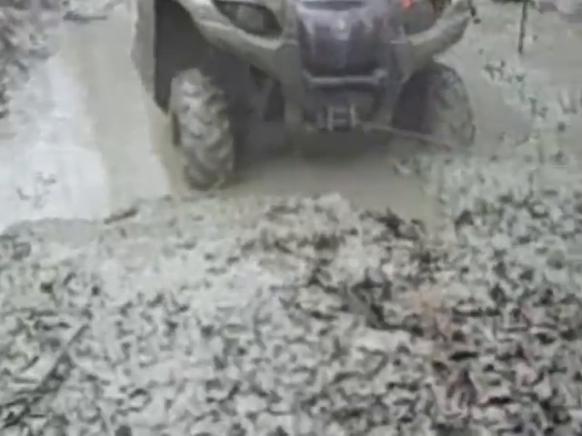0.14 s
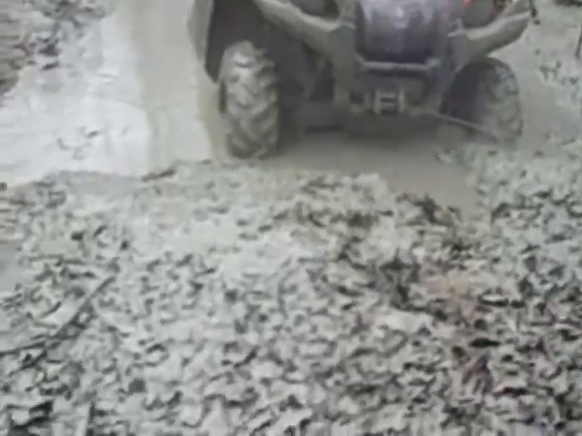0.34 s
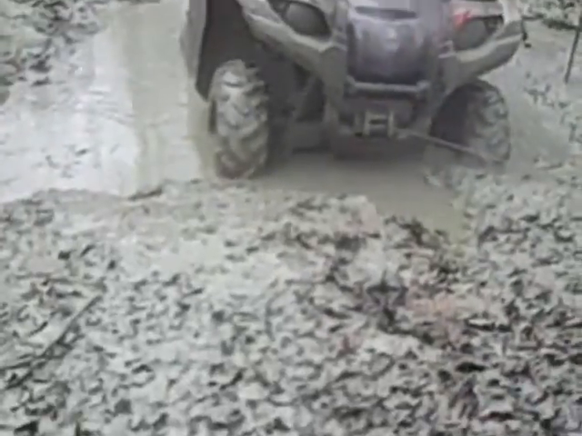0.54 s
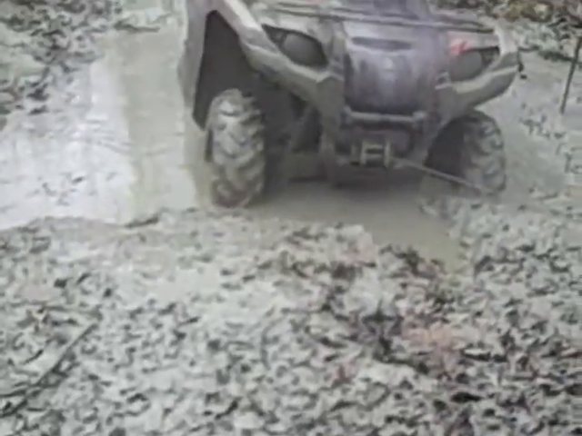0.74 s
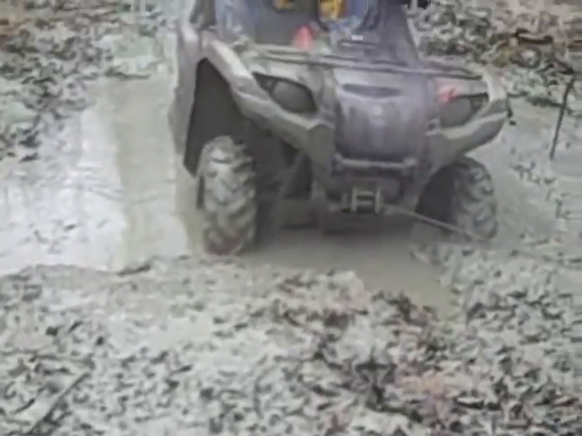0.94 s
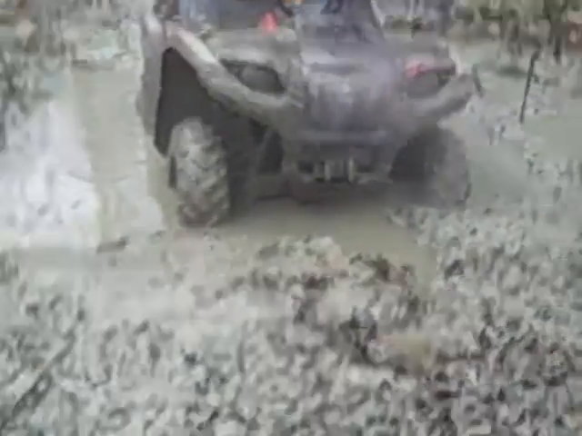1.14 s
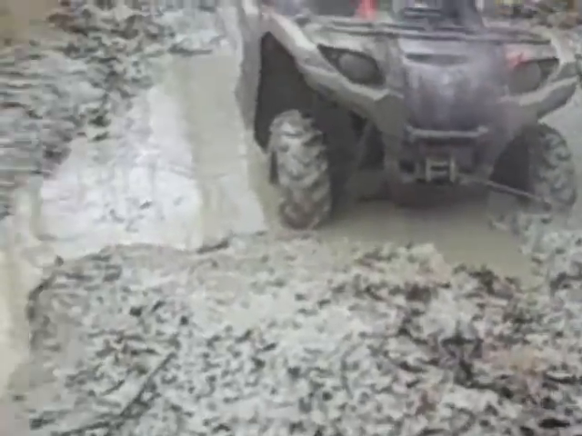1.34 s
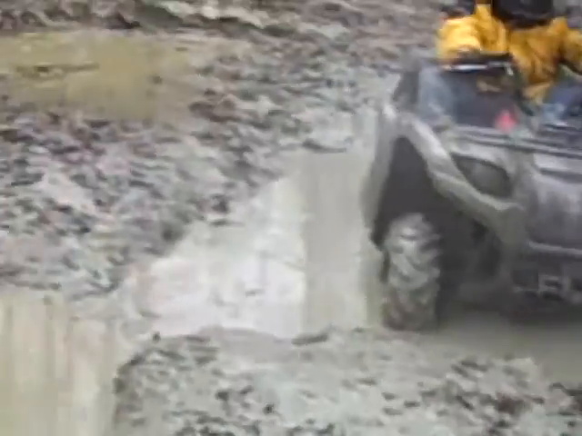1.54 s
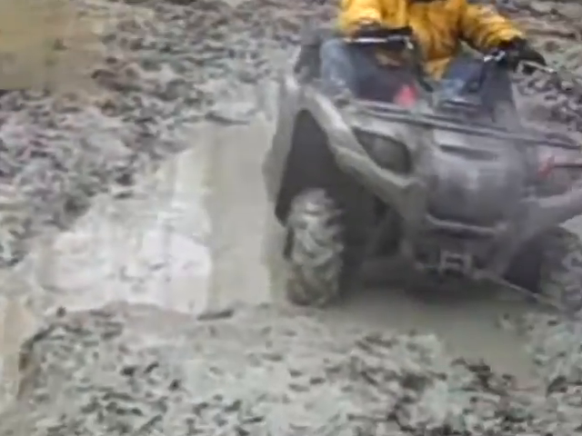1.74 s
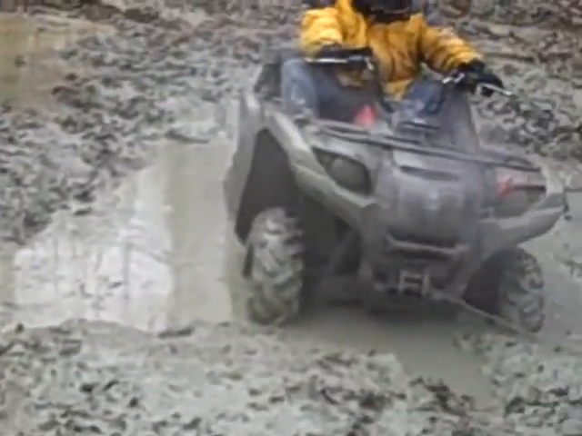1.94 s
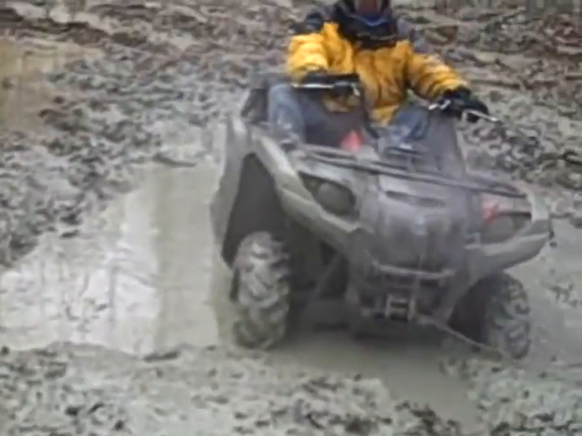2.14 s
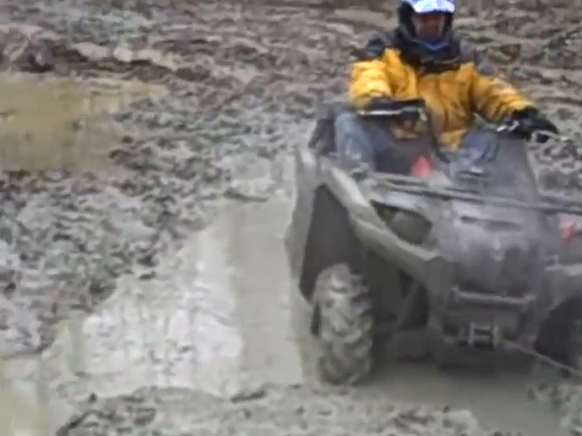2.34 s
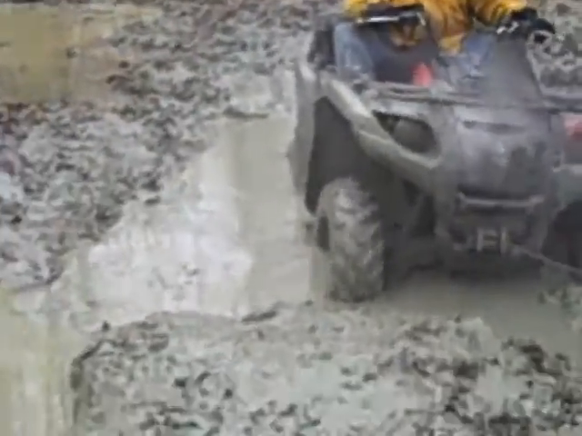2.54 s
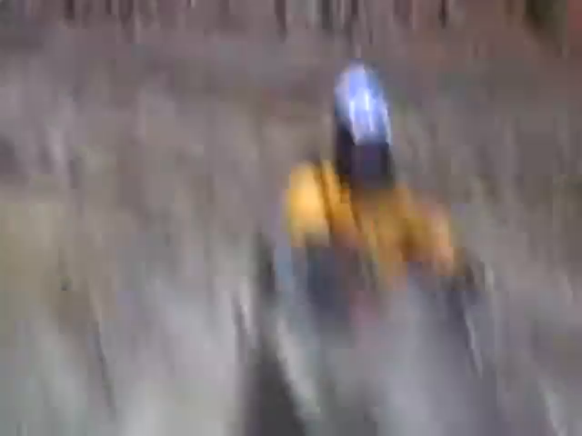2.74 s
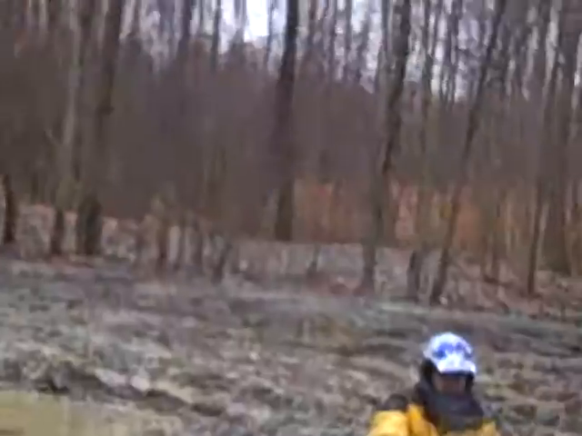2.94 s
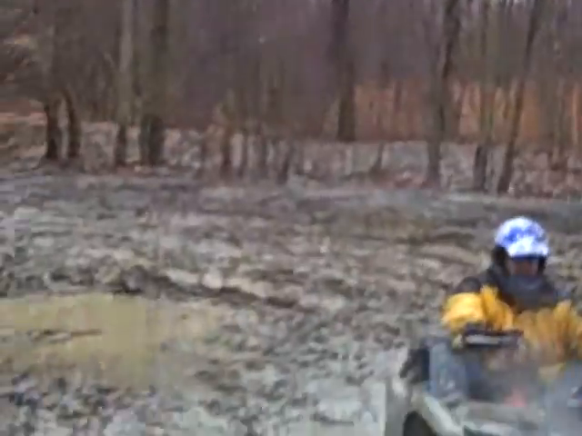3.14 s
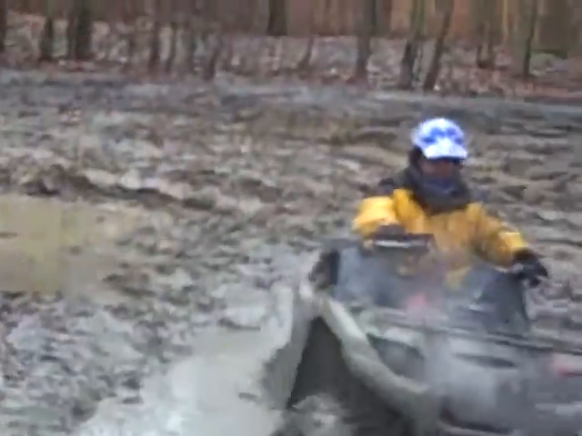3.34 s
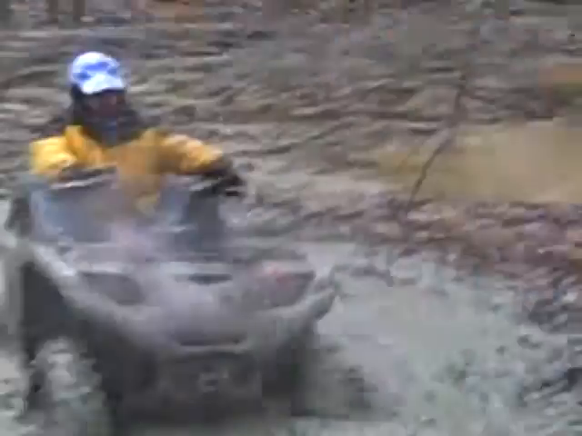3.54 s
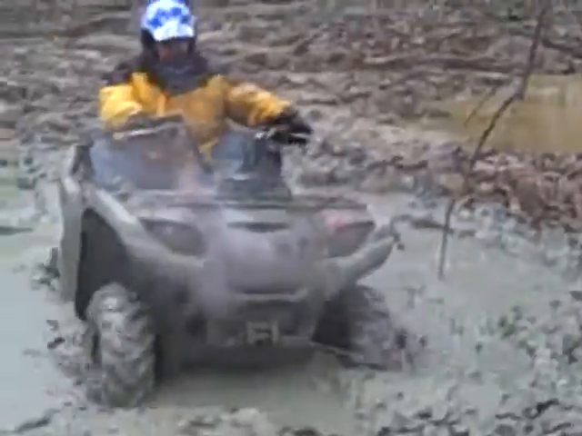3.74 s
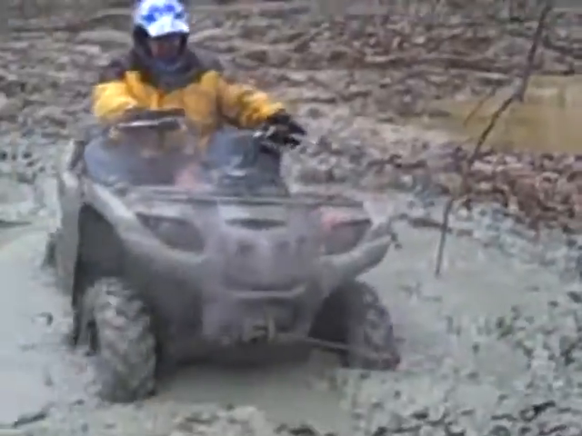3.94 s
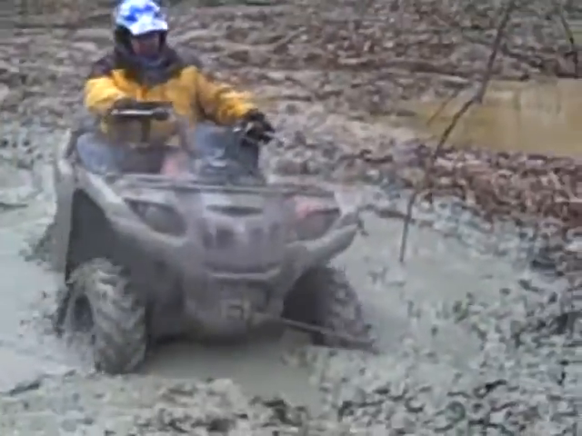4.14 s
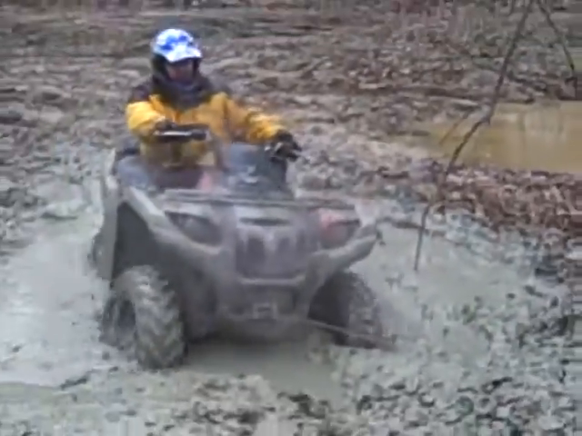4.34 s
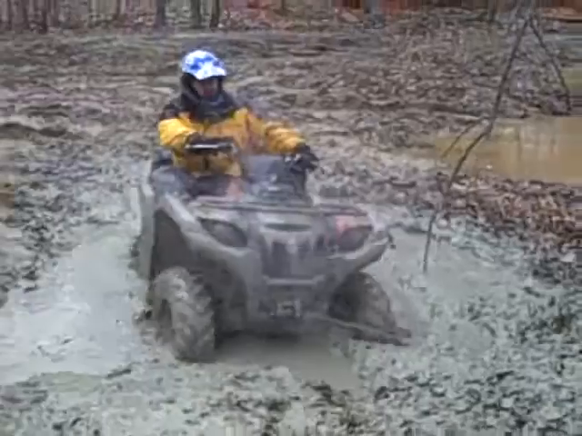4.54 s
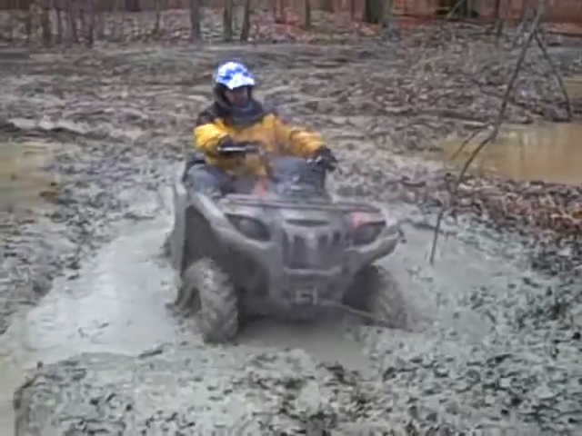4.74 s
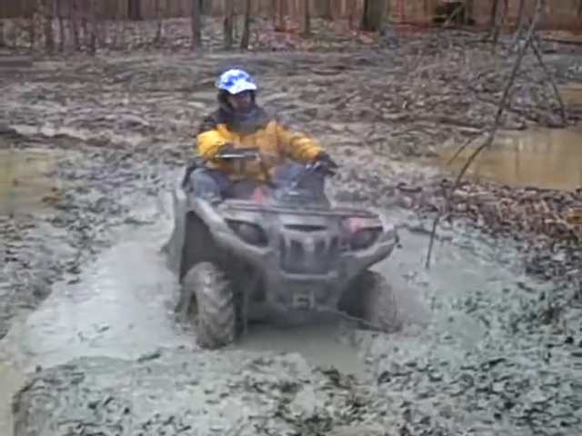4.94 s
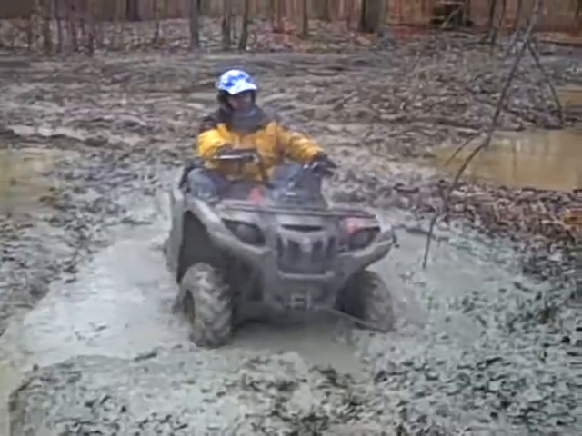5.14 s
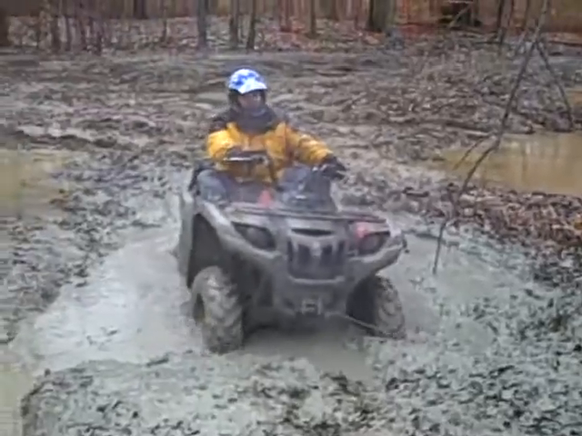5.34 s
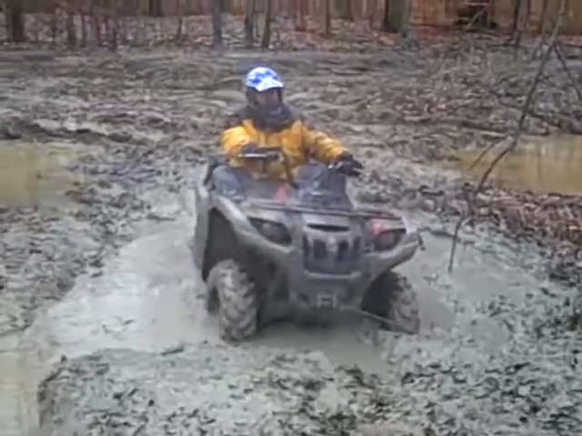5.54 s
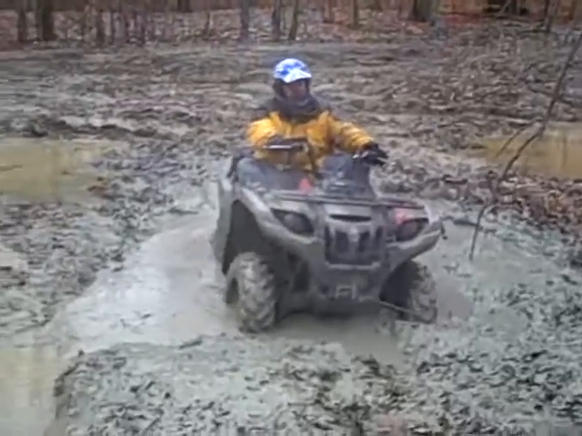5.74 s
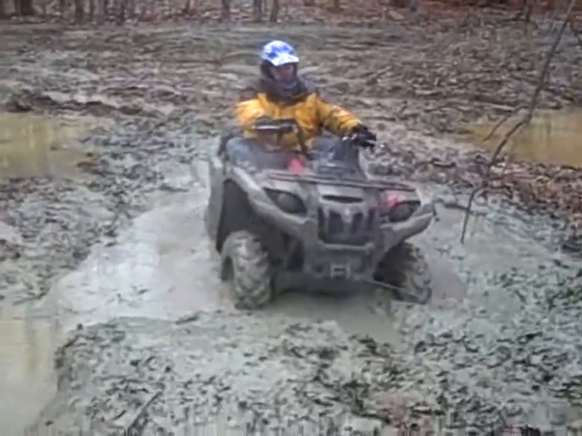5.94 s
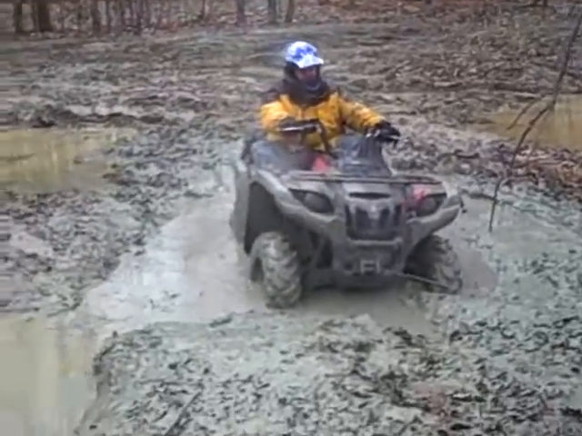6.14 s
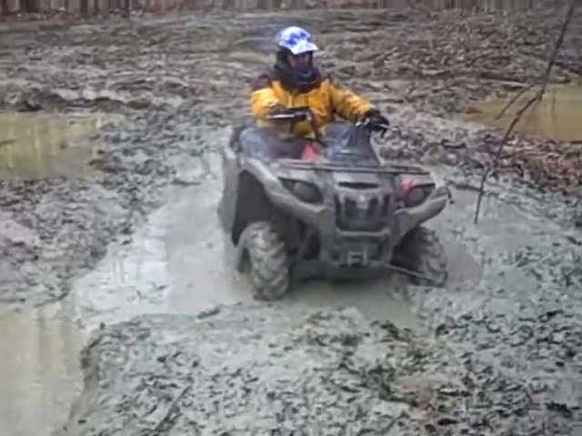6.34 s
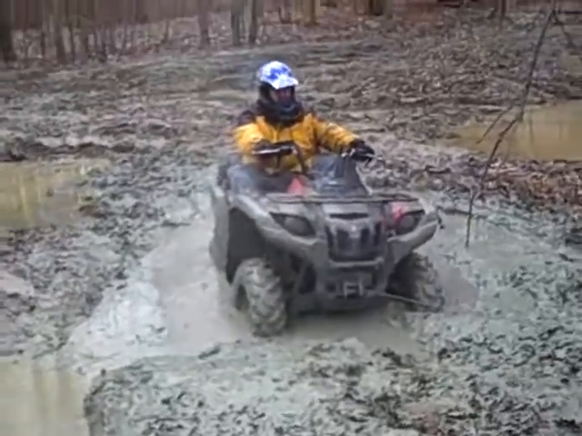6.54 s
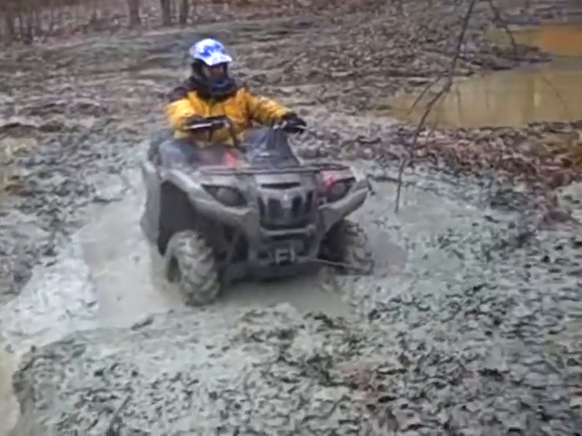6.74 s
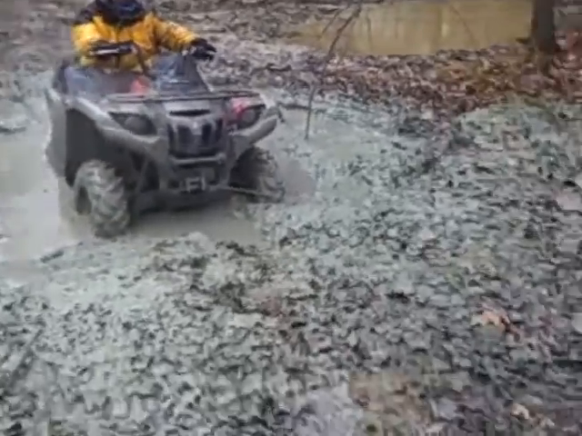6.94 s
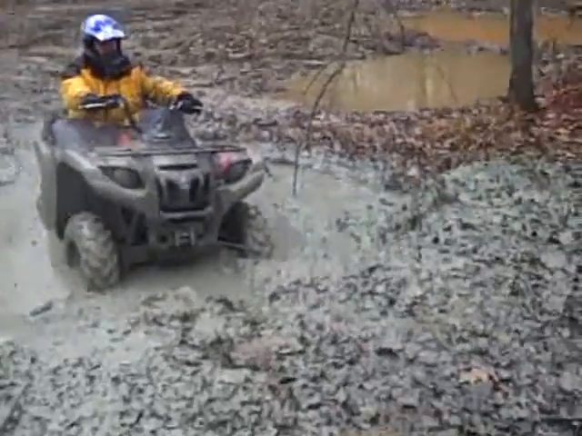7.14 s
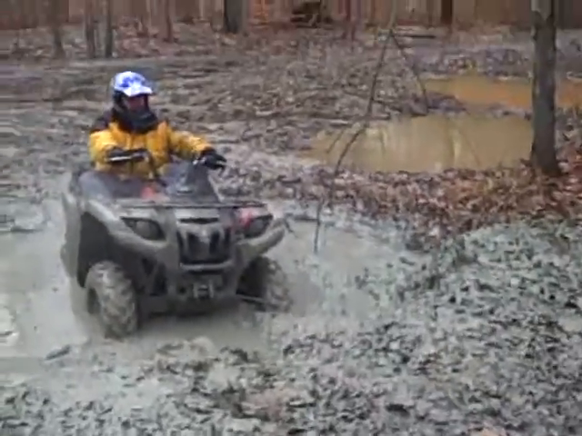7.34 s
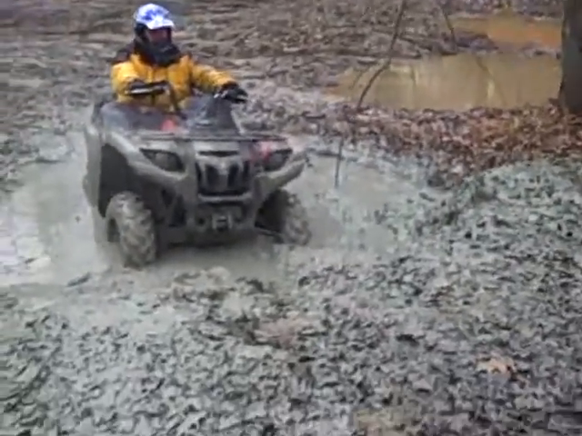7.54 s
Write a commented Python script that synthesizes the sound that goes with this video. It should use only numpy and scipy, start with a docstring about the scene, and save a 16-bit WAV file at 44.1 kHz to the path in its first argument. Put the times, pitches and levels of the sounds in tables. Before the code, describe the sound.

A quad bike idles with slow separate thuds in mud, blips, then revs hard with churning slurry and spray before settling back to idle.

```python
"""A single-cylinder quad bike in deep mud: separate thuds at idle, a blip, repeated revs, idle again.
Each firing triggers an exhaust pulse, gas rasp and airbox honk; noise knocks ring the engine covers.
Clumped drop grains and filtered noise form the churned slurry, spray, splats, squirts and trickle.
Clods smack down, wind puffs brush the microphone; late on a small metal part snaps and chatters in
a faint hiss. A notch and faint tail place it outdoors; the microphone dulls the treble."""
import sys
import numpy as np
from scipy import signal
from scipy.fft import rfft, irfft
from scipy.io import wavfile

SR = 44100
rng = np.random.default_rng(int(sys.argv[2]) if len(sys.argv) > 2 else 0)


def unload_audio(sound):
    """Save the sound as a 16-bit wav file, at the path given as the first command line argument."""
    columns = np.transpose(np.atleast_2d(sound))
    # keep every value between -1 and 1, then stretch to whole-number steps
    steps = np.round(np.clip(columns, -1, 1) * 32767)
    wavfile.write(sys.argv[1], SR, steps.astype(np.int16))


N = 335160
T = np.arange(N) / SR


def amp(db):
    """Decibels to gain."""
    return 10 ** (np.asarray(db) / 20)


def unit(x):
    """Scales to rms 1."""
    return x / np.sqrt(np.mean(x ** 2) + 1e-20)


def curve(rows, t=T):
    """Joins the rows (time [s], value) by straight lines."""
    return np.interp(t, *np.transpose(rows))


def add(mix, start_s, sound):
    """Mixes a sound in at start_s."""
    part = mix[max(0, round(start_s * SR)):][:len(sound)]
    part += sound[:len(part)]


def ring(spectrum, peaks=(), size=4096):
    """Minimum-phase impulse response, energy 1, of a spectrum with resonances (Hz, width Hz, dB)."""
    hz = abs(np.fft.fftfreq(size, 1 / SR))
    f, db = np.transpose(spectrum)
    db = np.interp(np.log(hz + 1), np.log(f), db)
    for centre, width, height in peaks:
        db = db + height / (1 + (2 * (hz - centre) / width) ** 2)
    causal_log = np.conj(signal.hilbert(np.log(amp(db))))
    h = np.fft.ifft(np.exp(causal_log)).real
    return h / np.linalg.norm(h)


def thump(spectrum, size=2048):
    """Zero-phase pressure pulse of height 1, symmetric about its middle."""
    f, db = np.transpose(spectrum)
    hz = np.fft.rfftfreq(size, 1 / SR)
    pulse = np.fft.fftshift(irfft(amp(np.interp(np.log(hz + 1), np.log(f), db))))
    return pulse / pulse.max()


def through(x, h):
    """Convolves x with the response h."""
    return signal.oaconvolve(x, h)[:N]


def wander(rate_hz):
    """Slow random fluctuation of rms 1."""
    lowpass = 1 / (1 + (np.fft.rfftfreq(N, 1 / SR) / rate_hz) ** 4)
    return unit(irfft(rfft(rng.standard_normal(N)) * lowpass, N))


def held(start_s, length_s, rise_s, fall_s):
    """Envelope: linear rise, hold, exponential decay."""
    rise = np.clip((T - start_s) / rise_s, 0, 1)
    return rise * np.exp(-np.maximum(T - start_s - length_s, 0) / fall_s)


def burst(centre_s, half_length_s, edge=3.0):
    """Brief swell with a flat top and steep sides."""
    return np.exp(-np.minimum(abs((T - centre_s) / half_length_s), 4) ** edge)


def patchy(x, depth_db, width_hz, length_s):
    """Random narrow bands swell and fade, so the colour keeps shifting."""
    hz, t, z = signal.stft(x, SR, nperseg=1024, noverlap=768)
    across = np.fft.fftfreq(len(hz), hz[1])[:, None]
    along = np.fft.fftfreq(len(t), t[1])
    blur = np.exp(-(across * width_hz) ** 2 - (along * length_s) ** 2)
    field = unit(np.fft.ifft2(np.fft.fft2(rng.standard_normal(z.shape)) * blur).real)
    z = z * amp(depth_db * np.clip(field, -2, 2))
    return unit(signal.istft(z, nperseg=1024, noverlap=768)[1][:N])


def grains(per_s, low_hz, high_hz, cycles, spread_db, clump_db, count=28):
    """Bursting bubbles and drops: short rings of rising pitch, in clumps, over count pitches."""
    out = np.zeros(N)
    for hz in np.linspace(low_hz, high_hz, count):
        u = np.arange(int(4 * cycles * SR / hz)) * hz / SR / cycles
        grain = np.sin(2 * np.pi * cycles * u * (1 + u / 20)) * np.exp(-2 * u)
        at = np.flatnonzero(rng.random(N) < per_s / count / SR)
        clump = curve(np.c_[np.linspace(0, T[-1], 200), rng.standard_normal(200)], T[at])
        size_db = spread_db * np.minimum(rng.exponential(1, len(at)), 4) + clump_db * clump
        train = np.zeros(N)
        train[at] = amp(size_db) * (-1) ** at
        out += through(train, unit(grain) / np.sqrt(len(u)))
    return unit(out)


# engine speed: (time [s], firing rate [1/s])
ENGINE_SPEED = [(0.0, 12.71), (0.19, 13.04), (1.37, 13.31), (2.33, 12.99), (2.54, 29.58), (2.69, 20.97),
                (2.8, 20.52), (3.02, 33.58), (3.25, 32.36), (3.6, 20.74), (3.81, 18.04), (4.0, 33.0),
                (4.11, 25.93), (4.58, 25.18), (5.03, 17.44), (5.12, 18.29), (5.5, 13.06), (7.6, 13.14)]
IDLE_RATE_HZ = 13.1


def firing_rate(t=T):
    """Firings per second at time t."""
    return curve(ENGINE_SPEED, t)


def octaves():
    """Engine speed in doublings above idle."""
    return np.log2(firing_rate() / IDLE_RATE_HZ)


# rider's thumb opens the throttle: (start [s], held [s], extra blow strength [dB])
THROTTLE_OPENINGS = [(2.319, 0.2, 11.5), (2.801, 0.32, 9.5), (3.06, 0.31, 5), (3.38, 0.26, 4),
                     (3.799, 0.21, 9.5), (4.02, 0.055, 8), (4.17, 0.084, 8.5), (4.37, 0.32, 6.5),
                     (4.741, 0.43, 5), (5.1, 0.11, 0.5)]
THROTTLE_OPEN_S, THROTTLE_SHUT_S = 0.059, 0.014


def throttle():
    """Extra blow strength from the open throttle, dB."""
    return sum(db * held(start, length, THROTTLE_OPEN_S, THROTTLE_SHUT_S)
               for start, length, db in THROTTLE_OPENINGS)


# weaker or stronger firings: (time [s], strength change [dB])
UNEVEN_FIRINGS = [(.01, -9.5), (.923, -4), (1.525, -7), (2.42, 1), (2.465, 1.5), (2.505, 0.5), (2.54, 7),
                  (2.613, 2.5), (2.701, 3), (2.797, 5), (2.575, 2), (2.843, 0), (3.05, 1.5), (3.08, -7.5),
                  (3.11, -5.5), (3.26, 2), (3.435, 2.5), (3.56, 2), (3.655, 6), (3.758, -9), (3.81, 6),
                  (4.07, 3.5), (4.145, 2), (4.34, 1), (4.615, -2.5), (4.94, 1.5), (5.218, 7.5), (5.279, 1),
                  (5.412, -20), (6.25, -22), (6.931, -6)]
IDLE_BLOW_DB, BLOW_DB_PER_OCTAVE = -34.5, 4  # before the exhaust's own gains


def firings():
    """Firing times, strengths in dB and cycles turned; strength grows with speed and throttle."""
    cycles = np.cumsum(firing_rate()) / SR - 1 / 10
    times = np.interp(np.arange(int(cycles[-1]) + 1), cycles, T)
    force_db = IDLE_BLOW_DB + BLOW_DB_PER_OCTAVE * octaves() + throttle()
    db = np.interp(times, T, force_db) + 0.74 * rng.standard_normal(len(times))
    for when, change_db in UNEVEN_FIRINGS:
        db[np.argmin(abs(times - when))] += change_db
    jitter_s = .00015 * rng.standard_normal(len(times))
    return times + jitter_s, db, cycles


# blow running to and fro in the exhaust: (delay [s], share [ratio])
PIPE_ECHOES = [(.0043, 1), (0.0102, 0.96), (.0185, .12), (0.026, 0.22)]
# idle blow spectrum: (frequency [Hz], relative level [dB per Hz])
IDLE_BLOW = [(20, -31), (50, -23), (80, -5.5), (115, 2.5), (150, -1.5), (200, -2), (260, -1), (320, -8),
             (400, -20), (520, -20), (700, -31), (1500, -34.5), (4000, -59.5)]
# blow spectrum at speed: (frequency [Hz], relative level [dB per Hz])
REV_BLOW = [(20, -23.5), (45, -21.5), (75, -6), (110, 3), (160, -2), (235, 7), (290, -7), (385, -27.5),
            (510, -23), (750, -27), (1500, -42), (4000, -63.5)]
# silencer ringing: (frequency [Hz], relative level [dB], decay [s])
SILENCER_MODES = [(257, -5, 0.0056), (331, -6.5, 0.01), (505, -14, 0.011)]


def exhaust(times, strengths, lead_s=0.00347, idle_db=22.0, bark_from_db=-19, bark_growth=0.76):
    """Idle: dull thuds with pipe echoes; at speed: tight thumps, and hard blows bark the silencer."""
    rev_db, echo_s, echo_share = -.8, .0087, .3
    slow, fast, t = np.zeros(N), np.zeros(N), np.arange(SR // 10) / SR
    pulse = thump(REV_BLOW)
    bark = sum(amp(db) * np.cos(2 * np.pi * hz * t) * np.exp(-t / decay)
               for hz, db, decay in SILENCER_MODES)
    bark *= 1 - np.exp(-t / 0.00045)
    for s, db in zip(times, strengths):
        revving = np.clip((firing_rate(s) - 13.8) / 1.7, 0, 1)
        size = -amp([db])  # wave starts with a pressure dip
        for delay, share in [(0.000068, 1)] + PIPE_ECHOES:
            varied = share * (1 + 0.031 * rng.standard_normal())
            add(slow, s - lead_s + delay, size * (1 - revving) * varied)
        # under load, blows differ in size and echo
        burn = amp(1.5 * rng.standard_normal())
        bounce = 1 + .6 * rng.standard_normal()
        for delay, share in [(0, 1), (echo_s, echo_share * bounce)]:
            add(fast, s + delay - len(pulse) / 2 / SR, size * revving * burn * share * pulse)
        add(fast, s, size * revving * amp(bark_growth * min(db - bark_from_db, 0)) * bark)
    return amp(idle_db) * through(slow, ring(IDLE_BLOW)) + amp(rev_db) * fast


# harsh gas spectrum: (frequency [Hz], relative level [dB per Hz])
GAS_SPECTRUM = [(30, -23.5), (70, -4), (130, -4), (230, 4), (320, 5.5), (410, 3.5), (520, 2), (700, -5.5),
                (1100, -4), (2000, -6.5), (3400, -1.5), (5000, -11.5), (7000, -39.5), (9000, -36)]


def rasp(times, strengths, decay_s=0.024, growth=1.65, level_db=-22, repeat=0.62):
    """Harsh gas noise puffs with each blow, partly alike, growing with blow strength and speed."""
    puffs, t = np.zeros(N), np.arange(SR // 10) / SR
    own = rng.standard_normal(len(t))
    shape = (1 - np.exp(-t / 0.0042)) * np.exp(-t / decay_s)
    for s, db in zip(times, strengths):
        gas = unit(repeat * own + (1 - repeat) * rng.standard_normal(len(t)))
        flow = np.clip(firing_rate(s) / 26, 0, 1) ** 2
        add(puffs, s - .003, amp(level_db + growth * (db + 22.5)) * flow * shape * gas)
    return through(puffs, ring(GAS_SPECTRUM, [(517.0, 35, 6.4), (1057, 38, 5.7), (3630, 130, 3.9)]))


# valve gear knocks: (phase after firing [cycles], relative size [ratio])
VALVE_KNOCKS = [(0.03, 0.37), (.14, 0.48), (0.238, 1), (0.449, 0.29), (0.662, 0.34), (.82, 0.56)]
# engine noise spectrum: (frequency [Hz], relative level [dB per Hz])
CASE_SPECTRUM = [(25, -31.5), (45, -24), (90, 4), (250, 2), (410, 0.5), (520, -2), (650, -2.5), (1200, -2),
                 (1900, -5), (2600, -8), (3600, -8.5), (4400, -15.5), (7200, -19.5), (9000, -40)]
# ringing of covers and frame: (frequency [Hz], width [Hz], height above the rest [dB])
COVER_MODES = [(553, 22, 3.5), (806, 53, 6.5), (1190, 280, 2.5), (1351, 34, 10), (1855, 220, 2.5),
               (5396, 260, 9)]


def clatter(cycles, decay_s=0.0039, knock=0.93, repeat=0.56, level_db=-42.5, db_per_decade=13,
            throb_db=1.0):
    """Valve knocks and the whirr of chain and belt sound through the engine's covers."""
    knocks, t = np.zeros(N), np.arange(SR // 20) / SR
    for phase, size in VALVE_KNOCKS:
        own = rng.standard_normal(len(t))  # part shared by every cycle
        for s in np.interp(np.arange(int(cycles[-1])) + phase, cycles, T):
            noise = unit(repeat * own + (1 - repeat) * rng.standard_normal(len(t)))
            add(knocks, s, size * amp(3.3 * rng.standard_normal()) * noise * np.exp(-t / decay_s))
    # whirr is loudest during the power stroke
    throb = throb_db * np.cos(2 * np.pi * (cycles - .2))
    whirr = rng.standard_normal(N) * amp(0.85 * wander(25) + throb)
    level = amp(level_db + db_per_decade * np.log10(firing_rate() / 13))
    source = patchy(whirr + knock * knocks, depth_db=3.0, width_hz=40, length_s=0.078)
    return level * unit(through(source, ring(CASE_SPECTRUM, COVER_MODES)))


# water off the wheels and frame: (time [s], level [dB])
TRICKLE_LEVEL = [(0, -53.5), (1.05, -48.5), (1.7, -54), (2.3, -54), (5.5, -65), (7.6, -78)]


def trickle():
    """Small drops fall back into the puddle as clumped ringing grains."""
    drops = grains(per_s=2500, low_hz=1960, high_hz=3760, cycles=13, spread_db=-1.5, clump_db=7.5,
                   count=16)
    return amp(curve(TRICKLE_LEVEL)) * drops


# wind on the microphone: (time [s], level [dB])
WIND_LEVEL = [(0, -80), (2.3, -74.5), (3.6, -61.5), (3.665, -39), (3.78, -52), (3.85, -56), (4.5, -64.5),
              (7.5, -79), (7.6, -49)]


def wind():
    """Low-frequency noise buffets the microphone."""
    colour = ring([(8, 0.0), (25, -15.0), (60, -11.0), (150, -32), (600, -59.0)])
    return amp(curve(WIND_LEVEL)) * unit(through(rng.standard_normal(N), colour))


# clods on the bodywork and in the puddle: (time [s], peak at source [dB], centre [Hz])
CLOD_HITS = [(0.431, -29, 3300), (0.504, -28, 3050), (0.623, -30, 2400), (0.677, -43, 4300),
             (0.802, -26, 3930), (0.914, -26, 2390), (2.346, -21, 1560), (2.41, -23, 1700),
             (3.0562, -7.5, 3440), (3.067, -10, 2940), (4.0677, -14, 3300), (4.408, -17, 1690),
             (4.5135, -14.5, 1700), (4.7725, -12, 1865), (4.9434, -11, 3300), (4.9535, -20, 2550),
             (5.064, -26, 2800), (5.176, -23, 2600), (5.235, -20, 2780)]
# brief jets of muddy water; the row at 7.227 is a faint hiss around the metal snap:
# (time [s], level at source [dB], half length [s], centre [Hz])
SQUIRTS_AND_HISS = [(0.182, -46.5, 0.036, 3340), (0.433, -50, 0.011, 3200), (0.511, -41.5, 0.016, 3600),
                    (0.846, -42, 0.015, 4450), (0.962, -51, 0.018, 4340), (2.417, -37, 0.017, 3140),
                    (2.502, -23.5, 0.011, 3580), (2.556, -34, 0.011, 3630), (2.771, -36.5, 0.016, 4440),
                    (2.847, -42.5, 0.085, 3040), (2.907, -32, 0.012, 3430), (2.985, -27, 0.032, 3740),
                    (3.049, -24, 0.022, 3440), (3.113, -24, 0.034, 3160), (3.24, -23.5, 0.025, 3360),
                    (3.313, -26.5, 0.0064, 3030), (3.387, -54, 0.0099, 2800), (3.465, -33.5, 0.038, 3800),
                    (3.571, -27.5, 0.023, 3600), (3.612, -35.5, 0.0087, 3600), (3.71, -36, 0.021, 3300),
                    (3.859, -32, 0.014, 3800), (3.946, -31.5, 0.015, 3900), (4.001, -34, 0.014, 3700),
                    (4.079, -30, 0.017, 3750), (4.182, -31, 0.016, 3980), (4.252, -33, 0.016, 3430),
                    (4.3, -34, 0.019, 3820), (4.437, -36.5, 0.014, 4200), (4.587, -28, 0.047, 3860),
                    (4.694, -54, 0.033, 3020), (4.821, -30, 0.028, 3600), (4.945, -29, 0.018, 3300),
                    (5.072, -33, 0.015, 3330), (5.172, -35.5, 0.017, 3350), (5.235, -30.5, 0.016, 3700),
                    (5.336, -41, 0.023, 2987), (7.227, -40, 0.0077, 3800), (7.409, -51, 0.021, 4280)]


def splashes(crack_s=0.0009, rise_s=0.00046, patter_s=0.021, patter_share=0.084, spatter_db=-0.5):
    """Clods smack wetly and patter; squirts, and a faint hiss at the snap, are coloured noise bursts."""
    out, t = np.zeros(N), np.arange(SR // 20) / SR
    shape = np.exp(-t / crack_s) + patter_share * np.exp(-t / patter_s)
    shape *= 1 - np.exp(-t / rise_s)
    for s, db, hz in CLOD_HITS:
        colour = ring([(hz / 10, -22), (hz / 2, -8), (hz, 0), (hz * 1.58, -6), (hz * 1.1, -30)])
        smack = through(rng.standard_normal(len(t)) * shape, colour)
        add(out, s, amp(db) * smack / abs(smack).max())
    noise = patchy(rng.standard_normal(N), depth_db=6, width_hz=60, length_s=.04)
    noise = noise * amp(spatter_db * wander(300))
    for s, db, length, hz in SQUIRTS_AND_HISS:
        near = abs(T - s) < 2 * length
        colour = ring([(300, -20), (hz * 0.29, -17), (hz, 0), (hz * 1.4, -3.5), (7000, -7), (9000, -24)])
        coloured = unit(signal.fftconvolve(noise[near], colour)[:near.sum()])
        out[near] += amp(db) * burst(s, length)[near] * coloured
    return out


# tyres working the mud: (start [s], length [s], churn at idle speed [relative dB],
# spray at idle speed [relative dB])
MUD_BOUTS = [(0.408, 0.14, -50.5, -45.5), (0.592, 0.33, -45.5, -43), (2.399, 0.082, -42.5, -36),
             (2.868, 0.59, -37, -36.5), (3.614, 0.16, -35, -37), (3.856, 0.31, -35.5, -38.5),
             (4.335, 0.71, -35.5, -42.5), (4.84, 0.48, -37.5, -42)]
# tread slaps out a wave of slurry: (time [s], relative level [dB], half length [s])
SLURRY_SLOPS = [(2.363, -31.5, 0.021), (2.416, -30.5, 0.019), (2.845, -32.5, 0.034), (3.137, -36, .02),
                (3.574, -31, 0.027), (3.625, -36, 0.01), (3.799, -32, 0.015), (4.25, -36, .015),
                (4.572, -33, 0.027), (4.823, -37, 0.013), (4.943, -47, 0.014), (5.066, -35.5, 0.033),
                (5.24, -48, 0.0059)]
BITE_S, CHURN_SETTLE_S, SPRAY_SETTLE_S = 0.017, 0.32, 0.18
CHURN_DB_PER_OCTAVE, SPRAY_DB_PER_OCTAVE = 7.5, 6  # per doubling of engine speed
CHURN_PUSH, SPRAY_PUSH = 0.025, 0.18  # dB per dB of throttle


def thrown():
    """Churn and spray gains: each bout follows engine speed and throttle; slops add to the churn."""
    churn = np.max([amp(db) * held(s, length, BITE_S, CHURN_SETTLE_S)
                    for s, length, db, _ in MUD_BOUTS], axis=0)
    spray = np.max([amp(db) * held(s, length, BITE_S, SPRAY_SETTLE_S)
                    for s, length, _, db in MUD_BOUTS], axis=0)
    speed, push_db = octaves(), throttle()
    slops = sum(amp(db) * burst(s, length) for s, db, length in SLURRY_SLOPS)
    return (churn * amp(CHURN_DB_PER_OCTAVE * speed + CHURN_PUSH * push_db) + slops,
            spray * amp(SPRAY_DB_PER_OCTAVE * speed + SPRAY_PUSH * push_db))


# churned slurry spectrum: (frequency [Hz], relative level [dB per Hz])
SLURRY_SPECTRUM = [(30, -32.5), (90, -20.5), (250, -2.5), (390, -10), (550, -1.5), (1200, 0), (2300, 2),
                   (3400, -4.5), (4500, -25), (7000, -23), (9000, -34)]
# fine spray spectrum: (frequency [Hz], relative level [dB per Hz])
SPRAY_SPECTRUM = [(200, -47), (1500, -18), (2600, 4.5), (3500, -2), (4600, 6), (5900, 3), (6300, -22),
                  (7200, 0), (9000, -6)]


def mud(cycles, churn_db=-2.5, spray_db=-4, wash=0.66, mist=0.34, throb_db=-0.9, surge_db=0.17):
    """Treads churn gurgling slurry and fling fine spray; both throb slightly with the firing cycle."""
    churn, spray = thrown()
    gurgle = grains(per_s=1800, low_hz=467.5, high_hz=4030, cycles=6.9, spread_db=0.5, clump_db=-0.5)
    gurgle = gurgle + wash * rng.standard_normal(N)
    fizz = grains(per_s=3000, low_hz=2233, high_hz=7640, cycles=14.0, spread_db=2.5, clump_db=1.5)
    fizz = fizz + mist * rng.standard_normal(N)
    gurgle = patchy(gurgle, depth_db=5.5, width_hz=52, length_s=0.086)
    gurgle = through(gurgle, ring(SLURRY_SPECTRUM))
    fizz = patchy(fizz, depth_db=6.5, width_hz=70, length_s=.06)
    fizz = through(fizz, ring(SPRAY_SPECTRUM))
    # negative throb_db: dips just after each firing
    surge = amp(surge_db * wander(27) + throb_db * np.cos(2 * np.pi * (cycles - .15)))
    return surge * (amp(churn_db) * churn * unit(gurgle) + amp(spray_db) * spray * unit(fizz))


def splats(per_s=55, low_hz=650, high_hz=3400, swell_s=0.0022, level_db=4, count=12):
    """Lumps flung off the treads land softly at random, in count kinds of colour and length."""
    out, t = np.zeros(N), np.arange(SR // 20) / SR
    for hz in np.geomspace(low_hz, high_hz, count):
        length = swell_s * 2 ** rng.uniform(-.5, 1)
        smack = rng.standard_normal(len(t)) * (t / length) ** 2 * np.exp(-t / length)
        colour = ring([(hz / 4, -40), (hz * .75, -12), (hz, 0), (hz * 1.4, -12), (hz * 3, -45)])
        lands = (rng.random(N) < per_s / count / SR).astype(float)
        out += through(lands, through(smack, colour))
    return amp(level_db) * thrown()[0] * out


# airbox spectrum: (frequency [Hz], relative level [dB per Hz])
AIRBOX_SPECTRUM = [(25, -34.5), (60, -3), (120, -12), (200, -2.5), (270, -10), (318, 0), (370, 6.5),
                   (430, -5), (520, -15.5), (800, -12.5), (2500, -54)]


def intake(times, cycles, phase=.42, level_db=-15, db_per_octave=30, full_rate_hz=33):
    """The airbox honks at each gulp of air between blows, fading steeply as the engine slows."""
    growth = 1.2  # dB per dB of throttle
    out, honk, opening_db = np.zeros(N), ring(AIRBOX_SPECTRUM, [(327.0, 50, 5)]), throttle()
    for s in np.interp(np.arange(len(times)) + phase, cycles, T):
        speed_db = db_per_octave * np.log2(firing_rate(s) / full_rate_hz)
        draw_db = growth * np.interp(s, T, opening_db) + speed_db
        add(out, s, amp(level_db + draw_db + 1.2 * rng.standard_normal()) * honk)
    return out


# small metal part on the winch, contacts: (time [s], relative level [dB])
CONTACTS = [(7.228, 1), (7.235, -7), (7.242, -13), (7.247, -19), (7.253, -21)]
# its ringing: (frequency [Hz], relative level [dB], T60 [s])
METAL_MODES = [(6420, -28, 0.012), (6520, -15.5, 0.023), (6640, -24, .016), (7000, -28, 0.026),
               (7150, -31, 0.045)]
# crack of the first contact: (frequency [Hz], relative level [dB per Hz])
CRACK_SPECTRUM = [(300, -22), (1500, -9), (2200, -8), (3100, 5), (4100, 2), (5200, -29), (9000, -12)]


def snap(crack_db=-22, crack_s=0.0039, contact_s=0.0018):
    """A dry crack, then a bright metal part chatters to rest, each contact with fresh phases."""
    out, t = np.zeros(N), np.arange(SR // 10) / SR
    for s, db in CONTACTS:
        tink = sum(amp(level - 60 * t / t60) * np.sin(2 * np.pi * (hz * t + rng.random() / 4))
                   for hz, level, t60 in METAL_MODES)
        add(out, s, amp(db) * tink * (1 - np.exp(-(t / contact_s) ** 2)))
    crack = through(rng.standard_normal(len(t)) * t * np.exp(-2 * t / crack_s), ring(CRACK_SPECTRUM))
    add(out, CONTACTS[0][0], amp(crack_db) * crack / abs(crack).max())
    return out


def outdoors(x, notch_hz=395, notch_width_hz=80, notch_db=-6):
    """The ground bounce weakens one low band; banks and trees scatter a faint tail."""
    wet_db, t60_s = -23, .24
    t = np.arange(SR // 2) / SR
    x = through(x, ring([(20, 0.0017), (9000, 0.0014)], [(notch_hz, notch_width_hz, notch_db)]))
    tail = rng.standard_normal(len(t)) * amp(-60 * t / t60_s) * (t > .012)
    return x + amp(wet_db) * through(x, tail / np.linalg.norm(tail))


def scene():
    """Engine and mud in the open, wind at the microphone."""
    times, strengths, cycles = firings()
    engine = exhaust(times, strengths) + intake(times, cycles)
    engine = engine + rasp(times, strengths) + clatter(cycles)
    wet = mud(cycles) + splats() + splashes() + trickle()
    return (outdoors(engine + wet + snap()) + wind())[None]


# microphone response: (frequency [Hz], gain [dB])
MICROPHONE_RESPONSE = [(20, 0.5), (7200, -1), (7350, -15), (8400, -17), (9100, -22.5)]
EDGE_HZ = 9160


def record(dry):
    """The microphone's dull treble, then a steep low-pass at the band edge."""
    h = ring(MICROPHONE_RESPONSE)
    heard = through(dry[0], h / abs(h.sum()))
    band_limit = signal.firwin(511, EDGE_HZ, window=("kaiser", 9), fs=SR)
    return signal.oaconvolve(heard, band_limit, "same")[None]


dry = scene()
out = record(dry)
unload_audio(out)
```